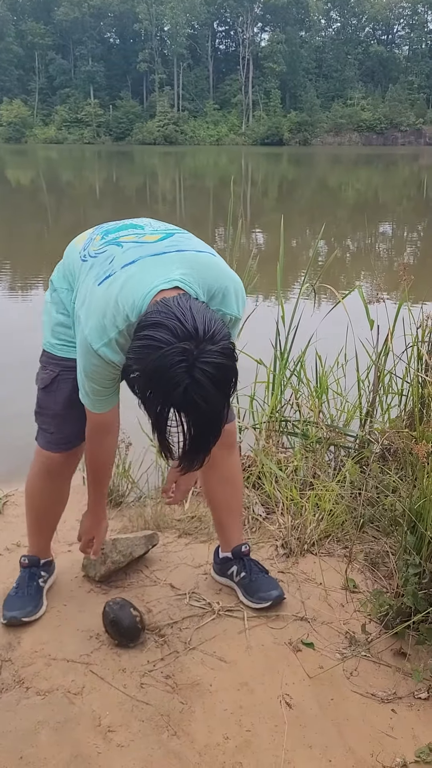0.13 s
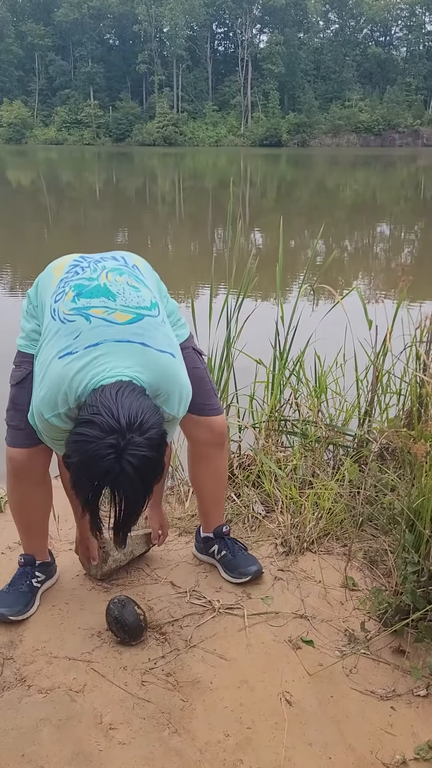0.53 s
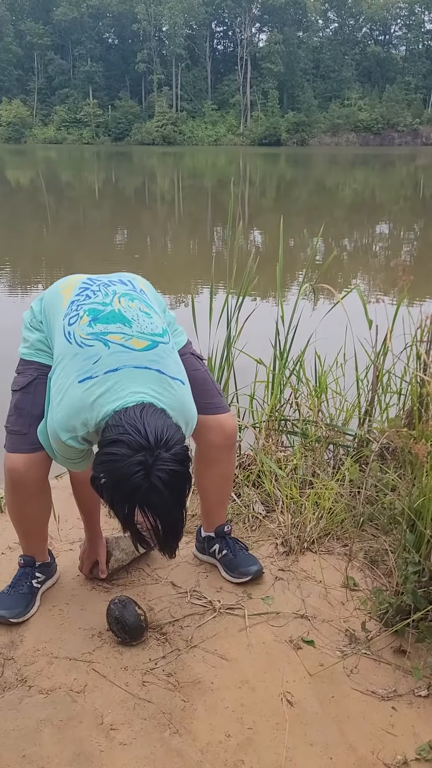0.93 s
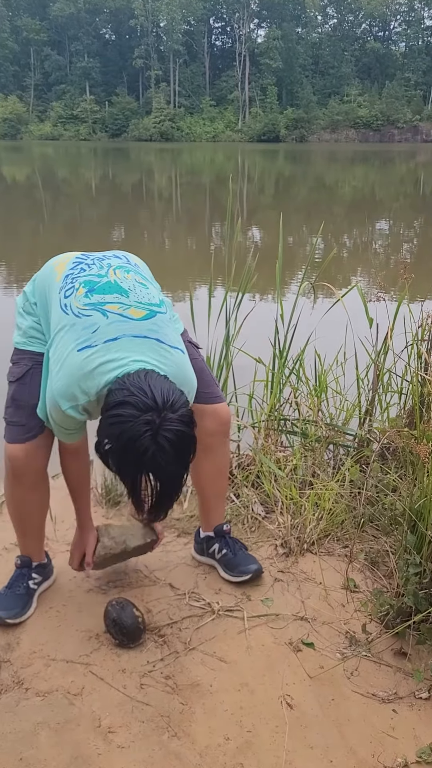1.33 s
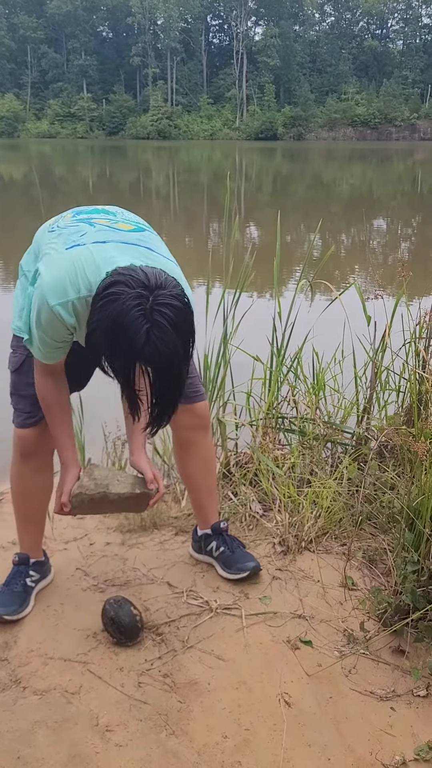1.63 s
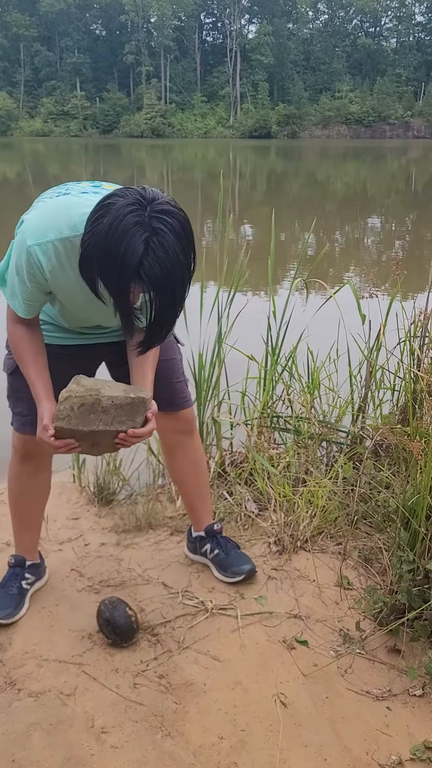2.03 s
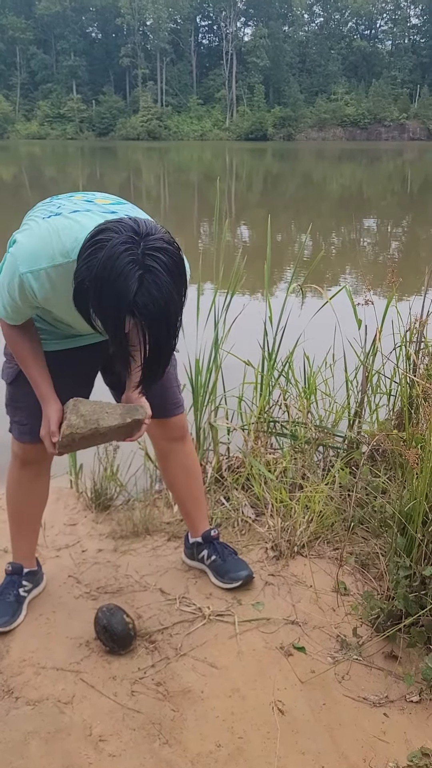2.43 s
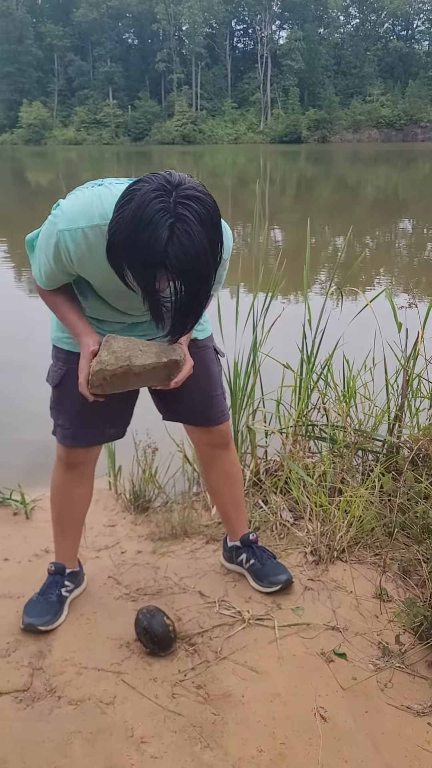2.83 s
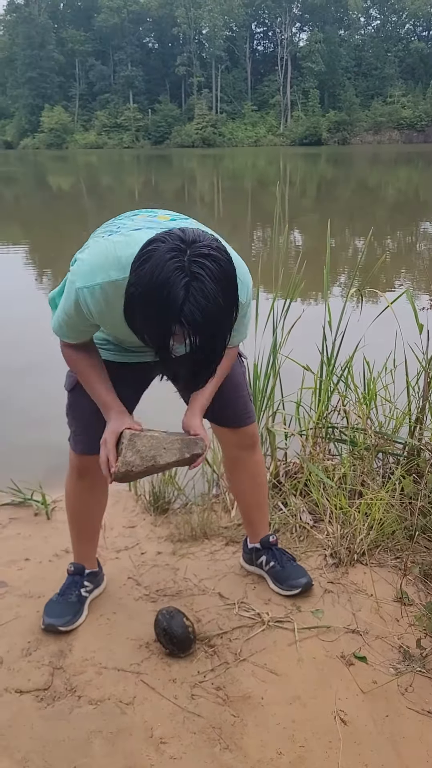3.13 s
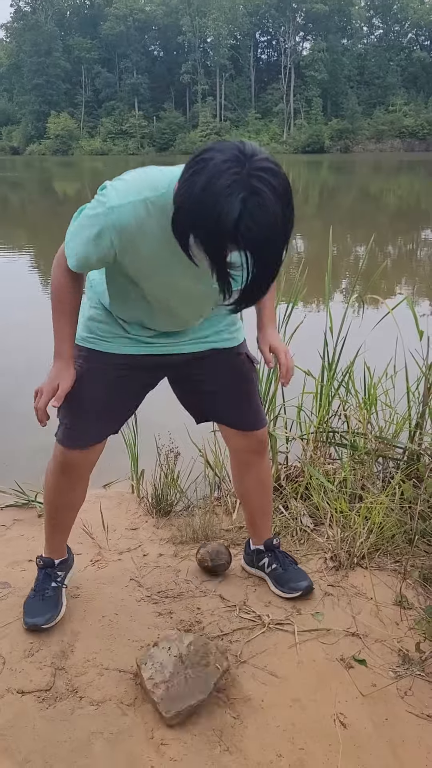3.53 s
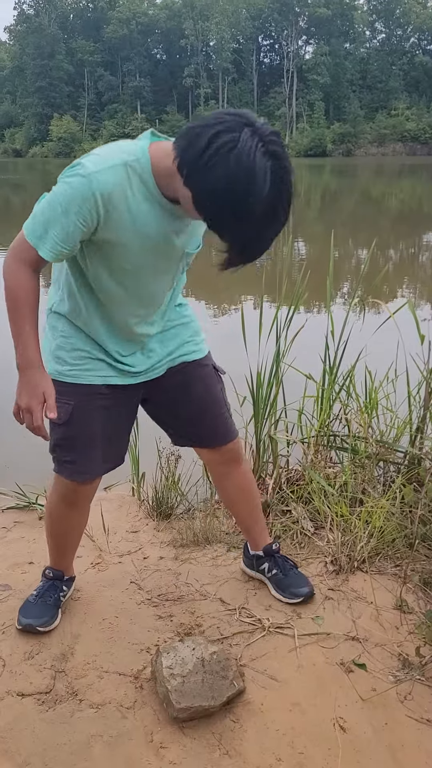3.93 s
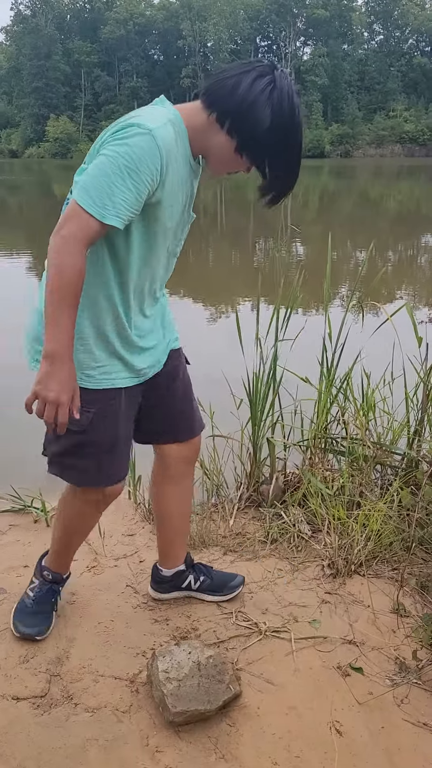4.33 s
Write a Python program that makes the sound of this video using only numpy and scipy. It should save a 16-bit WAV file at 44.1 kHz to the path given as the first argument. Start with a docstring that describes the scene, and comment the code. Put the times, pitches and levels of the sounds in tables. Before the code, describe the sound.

An open, echo-free sandy lakeshore heard through a phone's stereo microphones. A low, bassy bed of air and distant wavering machinery hum, with a very thin whine, runs throughout. From about 0.1 to 0.5 s, crisp gritty scuffs and a small dull thud sound as a rock is shifted on the sand. From 0.5 to 3.1 s it is quiet, with only faint cloth rustle and tiny sand ticks, rising slightly near 2.8 s. At about 3.28 s the rock hits a coconut: a very loud, sharp, dry knock, woody and hollow, with a deep short thud, a brief gritty scrape and a weaker second clack some 35 milliseconds later, spraying sand. The background dips slightly after it. Near 3.55 to 3.6 s the rock lands with a softer crunch and thump. From 3.9 to 4.4 s, shoes crunch the sand, strongest near 4.17 s, as bright clothing and reed rustle grows.

```python
"""Lake shore: a heavy rock knocks on a coconut on the sand, over distant machinery, open air and faint hiss.
The knock is short blows and a gritty slide ringing shell and rock modes, with noise bursts as sand spray.
Decaying sines thud in the ground; swelling, dying noise bursts are the sand crunching under shoes, rock and nut.
Bright noise is the rustle of clothes and reeds; wandering tones and low noise are the machinery.
A phone with two microphone ports listens, and its gain control ducks after the knock."""
import sys
import numpy as np
from scipy import signal
from scipy.io import wavfile
from scipy.ndimage import uniform_filter1d

SR = 44100
rng = np.random.default_rng(int(sys.argv[2]) if len(sys.argv) > 2 else 0)


def output_pcm(signal):
    """Save a mono or channel-first signal as 16-bit PCM at the path in sys.argv[1].

    Samples are clipped to [-1, 1] before scaling.
    """
    pcm = np.clip(np.atleast_2d(signal).T, -1, 1) * 32767
    wavfile.write(sys.argv[1], SR, np.round(pcm).astype(np.int16))


N = 198405
TIME = np.arange(N) / SR
LEFT_LAG = 8  # samples by which the impact reaches the left port later


def gain_of(db):
    """Decibels to gain."""
    return 10 ** (np.asarray(db) / 20)


def evened(x):
    """Scales to rms 1."""
    return x / np.sqrt(np.mean(x ** 2) + 1e-20)


def level(curve):
    """A (t/s, level/dB) curve read at every sample, silent outside its ends."""
    return np.interp(TIME, *np.transpose(curve), -200, -200)


def read(points, hz):
    """A spectrum table read on a log-frequency axis."""
    f, value = np.transpose(points)
    return np.interp(np.log(hz + 1), np.log(f + 1), value)


def band(x, lo_hz, hi_hz):
    """Band-pass."""
    return signal.sosfilt(signal.butter(2, [lo_hz, hi_hz], "bandpass", fs=SR, output="sos"), x)


def smoothed_noise(size):
    """White noise averaged over size samples: the larger, the slower it moves."""
    return uniform_filter1d(rng.standard_normal(N), size=size)


def grainy(spread_db, size):
    """A random level flicker of rms 1, as when grains slip in clumps; size in samples sets its pace."""
    return evened(gain_of(spread_db * evened(smoothed_noise(size))))


def narrow(hz, width):
    """A wavering tone of rms 1 whose pitch wanders slowly by width Hz rms."""
    wander = evened(uniform_filter1d(smoothed_noise(3000), size=3000))
    return np.sqrt(2) * np.sin(2 * np.pi * np.cumsum(hz + width * wander) / SR)


# how alike noise is at the two ports: (f/Hz, left-right correlation)
PORT_LIKENESS = [(60, 0.89), (130, 1), (290, 0.93), (640, 0.82), (1410, -0.07), (3100, -0.32), (6820, 0.19),
                 (15000, -0.14)]
# which port the noise leans to: (f/Hz, left over right level/dB)
PORT_LEAN = [(60, -3.5), (110, 1), (200, -2.5), (380, -2), (700, 0), (1290, -7), (2380, -7), (4400, 0),
             (8120, -6), (15000, 1)]


def noise(colour, patchy_db, size):
    """Stereo noise from random short-time spectra with drifting patches; the mono mix has rms 1."""
    hz = np.fft.rfftfreq(size, 1 / SR)
    a, b, c, d, patches = rng.standard_normal((4 * N // size + 5, len(hz), 5)).T
    patches = uniform_filter1d(patches, size=8, axis=0)
    patches = evened(uniform_filter1d(patches, size=10, axis=1))
    same = np.clip(read(PORT_LIKENESS, hz), -1, 1)[:, None]
    lean = gain_of(read(PORT_LEAN, hz)[:, None] / 2)
    left = a + 1j * b
    right = same * left + np.sqrt(1 - same ** 2) * (c + 1j * d)
    spectra = np.array([left * lean, right / lean])
    spectra *= gain_of(read(colour, hz)[:, None] + patchy_db * patches)
    out = signal.istft(spectra, nperseg=size, noverlap=3 * size // 4)[1][:, :N]
    return out / np.sqrt(np.mean(out.mean(0) ** 2))


# colour of the open air, mostly bass: (f/Hz, level per Hz/dB)
AIR_COLOUR = [(12, -78.5), (20, -34), (36, -5), (60, -5.5), (81, -7), (114, -5.5), (196, -15), (288, -17.5),
              (414, -29), (775, -31), (910, -29.5), (1070, -34.5), (1740, -37), (2500, -53.5), (3250, -100),
              (5500, -120)]
# colour of the faint hiss: (f/Hz, level per Hz/dB)
HISS_COLOUR = [(1470, -35.5), (2500, -27.5), (4730, -20), (6920, 0), (7890, -25.5), (9080, -5.5),
               (15200, -2), (16000, -19)]


def open_air():
    """A bass-heavy noise bed with a very faint hiss on top."""
    air = gain_of(-45.5) * noise(AIR_COLOUR, 1.7, size=2048)
    return air + gain_of(-79.5) * noise(HISS_COLOUR, 0.79, size=512)


# low tones of the hum: (f/Hz, wander/Hz, level in the hum/dB)
HUM_TONES = [(57.2, 2, 3.5), (112.2, 3.4, -5.5), (231.6, 5, -9)]
# tones of the whine: (f/Hz, level in the whine/dB)
WHINE_TONES = [(295.5, 2.5), (591, -4), (887, 5.5), (1182, -7)]
# hum rising and falling: (t/s, level/dB)
HUM_CURVE = [(0.0, -51), (0.08, -46.5), (0.5, -55), (0.8, -46.5), (0.9, -50), (1.07, -43.5), (1.22, -67),
             (1.35, -48.5), (1.72, -48.5), (1.8, -60), (2.07, -47), (2.56, -45.5), (2.63, -47.5),
             (2.78, -43.5), (3.14, -50), (3.3, -45.5), (3.7, -52), (3.85, -50.5), (4.3, -47.5),
             (4.499, -50.5)]
# rumble swelling: (t/s, level/dB)
RUMBLE_CURVE = [(0.0, -51.5), (0.56, -44.5), (1.1, -47), (1.22, -51.5), (1.6, -48.5), (2.2, -47),
                (2.9, -46), (3.3, -50), (3.9, -67), (4.4, -54)]
# whine coming and going: (t/s, level/dB)
WHINE_CURVE = [(0.0, -64.5), (0.1, -70.5), (0.3, -65), (0.65, -71.5), (0.75, -104), (0.82, -69.5),
               (0.93, -69), (1.07, -78), (1.2, -69.5), (1.3, -76.5), (1.5, -68), (1.78, -69), (1.9, -84),
               (2.15, -75), (2.42, -87), (2.55, -67), (2.63, -75.5), (2.75, -66), (3.2, -74.5), (3.69, -80),
               (4.0, -67), (4.29, -79), (4.4, -74), (4.499, -79)]


def machinery():
    """Distant machines: wavering low hum tones, a band of noise as swelling rumble, and a thin whine."""
    hum = sum(gain_of(db) * narrow(hz, width) for hz, width, db in HUM_TONES)
    hum = hum * grainy(1.88, size=3000)
    rumble = evened(band(rng.standard_normal(N), 69, 157.7)) * grainy(1.8, size=4000)
    whine = sum(gain_of(db) * narrow(hz, 1.23) for hz, db in WHINE_TONES)
    mix = hum * gain_of(level(HUM_CURVE))
    mix += rumble * gain_of(level(RUMBLE_CURVE))
    mix += whine * gain_of(level(WHINE_CURVE))
    return mix * gain_of([[-.7], [.7]])  # leans right


# clothes and reeds moving: (t/s, level of the rustle body/dB)
RUSTLE_CURVE = [(0.0, -49), (0.05, -53), (0.12, -77), (0.52, -68), (0.65, -70), (1.0, -64.5), (1.145, -58),
                (1.2, -76), (1.6, -80.5), (1.75, -64.5), (1.87, -70), (2.15, -61), (2.32, -62.5),
                (2.7, -69), (2.83, -58.5), (3.01, -59), (3.17, -58), (3.64, -58), (3.83, -57.5),
                (3.91, -56.5), (4.06, -55.5), (4.28, -52), (4.38, -53), (4.499, -75)]
# colour of the rustle: (f/Hz, level per Hz/dB)
CLOTH_COLOUR = [(1500, -4), (2500, -12), (3300, -20.5), (4400, -9.5), (7000, -3), (8700, -6.5),
                (10500, 9.5), (12500, 0), (14000, -4.5), (15500, -0.5), (16500, 4.5)]
TOP_DB, TOP_FOLLOW = 4.5, 0.94  # airy top over a body of -60 dB; dB it moves for each dB of the body


def rustle():
    """Rubbing cloth and reeds: bright hiss follows the movements, its airy top a little less strongly."""
    body_db = level(RUSTLE_CURVE)
    top_db = -60 + TOP_DB + TOP_FOLLOW * (body_db + 60)
    cloth = noise(CLOTH_COLOUR, 2, size=512) * grainy(1.4, size=1200)
    body = evened(band(cloth, 1500, 8800))
    top = evened(band(cloth, 8800, 20000))
    return body * gain_of(body_db) + top * gain_of(top_db)


# shoes, rock and nut crunching the sand: (t/s, peak level/dB, rise/s, hold/s, low crunch over hiss level/dB,
# boost of the airy top level/dB, crunch centre f/Hz, left over right level/dB)
SAND_SCUFFS = [(0.139, -36.5, 0.0048, 0.025, -8.5, -2.5, 1460, 0.5),
               (0.276, -38, 0.04, 0.0028, 3, -6.5, 2100, 0.5),
               (0.359, -31, 0.0078, 0.017, -3, -7.5, 1080, -0.5),
               (0.385, -44.5, 0.0081, 0.034, 9.5, -0.5, 1780, 3),
               (0.47, -70.5, 0.025, 0.063, 17, -10, 1590, 0), (1.905, -62.5, 0.006, 0.026, -24, 9, 2200, 0),
               (1.958, -57, 0.042, 0.11, -8.5, -4, 1840, -0.5), (2.17, -62, 0.032, 0.019, -23, 6, 2000, 3),
               (2.33, -58.5, 0.023, 0.029, -6, 7, 1750, 1), (2.39, -67.5, 0.022, 0.11, 11.5, -21, 1630, 0),
               (2.57, -57.5, .001, 0.0023, -15, -15, 2000, 0), (2.816, -61, .017, 0.064, -24, 7.5, 2190, 3),
               (2.95, -57.5, 0.018, 0.032, -9, 8.5, 1960, 3),
               (3.175, -46.5, 0.038, 0.018, -13, 9.5, 2000, 1.5),
               (3.327, -46.5, .004, 0.13, -1, -11, 2200, 3.5),
               (3.55, -42.5, 0.003, 0.0072, -26, 5, 2020, 4),
               (3.566, -41.5, 0.0075, 0.011, -18, -7, 1330, 1), (3.611, -59, 0.0067, 0.02, 2, 9, 1660, -3),
               (3.853, -58.5, 0.0095, 0.033, -15, 5, 1970, 3),
               (3.92, -59.5, 0.0048, 0.035, -18, 12, 2000, 2),
               (3.975, -49, 0.027, 0.022, -2.5, 9.5, 2160, 2),
               (4.099, -54, 0.0016, 0.002, 12.5, 12.5, 1990, 5),
               (4.165, -40.5, .003, 0.025, -3.5, 1, 1330, 0),
               (4.19, -51, 0.014, 0.034, 4.5, 11.5, 2150, 3.5),
               (4.352, -49.5, .009, 0.012, -1.5, 3, 2030, 2)]
# colour of the sand hiss: (f/Hz, level per Hz/dB)
SAND_COLOUR = [(1290, -6), (2200, -0.5), (3090, -12.5), (3300, -8), (4070, -4.5), (4420, -2.5), (4840, -4),
               (6470, -1), (9020, -13.5), (12300, -1), (16000, -7)]
CREST = 3  # peak over rms of a burst of grains
STOP_T60, T60_PER_HOLD = 0.013, 2.9  # s, and s per s of hold: longer scuffs die more slowly
TRICKLE_DB, TRICKLE_T60 = -10.5, 0.57  # loose grains settling: dB against the burst, s


def scuffs():
    """Each scuff is a burst of sand grains that swells, holds and dies; weight on them adds a lower crunch."""
    grains = grainy(1.4, size=60) * grainy(1.1, size=400)
    hiss = noise(SAND_COLOUR, 1.0, size=256) * grains
    coarse = noise([(100, 0), (16000, 0)], 3, size=256) * grains  # flat colour
    top = signal.sosfiltfilt(signal.butter(4, 9000, "highpass", fs=SR, output="sos"), hiss)
    out = np.zeros((2, N))
    for s, db, rise, hold, crunch_db, top_db, hz, pan_db in SAND_SCUFFS:
        swell = np.sin(np.pi / 2 * np.clip((TIME - s) / rise, 0, 1)) ** 2
        after = np.maximum(TIME - s - rise - hold, 0)
        stop = gain_of(-60 * after / (STOP_T60 + T60_PER_HOLD * hold))
        trickle = gain_of(TRICKLE_DB - 60 * after / TRICKLE_T60)
        shape = swell / CREST * gain_of(db) * (stop + trickle)
        crunch = evened(band(coarse, hz / 1.47, hz * 1.3))
        burst = hiss - top + gain_of(top_db) * top + gain_of(crunch_db) * crunch
        out += shape * gain_of([[pan_db / 2], [-pan_db / 2]]) * burst
    return out


# dull weight landing on the ground: (t/s, level before the soft onset/dB, f/Hz, t60/s)
GROUND_THUDS = [(0.144, -23.5, 273, 0.026), (3.285, -7.5, 273, 0.031), (3.288, -21, 103.7, 0.14),
                (3.295, -25, 318, 0.054), (3.326, -19, 222, 0.045), (3.333, -15, 110.3, 0.045),
                (3.613, -20, 206, 0.031)]


def thuds():
    """The ground gives under a weight: a low sine with a soft onset that dies quickly."""
    out = np.zeros(N)
    for s, db, hz, t60 in GROUND_THUDS:
        t = np.maximum(TIME - s, 0)
        onset = 1 - np.exp(-t / 0.0045)
        out += gain_of(db - 60 * t / t60) * np.sin(2 * np.pi * hz * t) * onset
    return np.array([np.roll(out, LEFT_LAG), out])


# rock meets shell: (t/s, blow level/dB, contact time/s)
ROCK_BLOWS = [(3.282, -27, 0.00008), (3.2843, -0.5, 0.0006), (3.2864, 1, 0.00017), (3.2878, -6.5, 0.00016),
              (3.2947, -36, .0003), (3.299, -24.5, .0006), (3.3174, -21.5, 0.00019), (3.3199, -9.5, .0002)]
# rock grinds over shell into the sand: (t/s, pressure level/dB)
GRIND_PRESSURE = [(3.2835, -84), (3.2845, -29), (3.288, -39.5), (3.299, -38.5), (3.314, -40), (3.3195, -38),
                  (3.323, -39.5), (3.331, -59.5), (3.40, -72.5), (3.45, -95.5)]
# modes of shell and rock: (f/Hz, t60/s, left level/dB, right level/dB)
SHELL_MODES = [(466, 0.014, -15, -16.5), (800, 0.0083, -2, -2), (850, 0.0039, -7.5, -2),
               (1246, 0.018, -20, -10.5), (1880, .02, -18, -10.5), (1860, 0.018, -11.5, -3),
               (1980, 0.011, -21.5, 2), (2200, .012, -16, -9), (2330, 0.01, -11, -9.5),
               (2570, .01, -7.5, -10.5), (2690, 0.0032, -20.5, -26.5), (3210, 0.0046, -4, -28.5),
               (4230, 0.002, -2.5, -20)]
# colour of the flying sand and splinters: (f/Hz, level per Hz/dB)
SPRAY_COLOUR = [(1290, -37.5), (2200, -11), (2430, -0.5), (2800, -15), (3440, -7), (5000, -11.5),
                (6010, -15), (6980, -9.5), (8660, -25), (10600, -13.5), (15100, -27), (16000, -27)]
SPRAY_DB = 12  # sand thrown by the slide, over its pressure
PUFF_DB, PUFF_T60 = -28.5, 0.015  # puff of splinters: dB against its blow, s


def knock():
    """Blows and a gritty slide drive the same modes, caught differently by each port; splinters and sand fly."""
    pressure = gain_of(level(GRIND_PRESSURE))
    spray = pressure * gain_of(SPRAY_DB)
    grit = rng.standard_normal((3, N))
    grit = grit[0] + .55 * grit[1:]  # partly shared by the two ports
    # light grit cannot move the low modes
    drive = band(grit, 990, 9000) * grainy(1.7, size=40) * pressure
    for s, db, contact in ROCK_BLOWS:
        u = (TIME - s - contact) / contact
        push_and_rebound = u * np.exp(-2 * u ** 2) / (contact * SR)  # shorter contact hits sharper
        drive = drive + gain_of(db) * push_and_rebound
        spray = spray + (TIME > s) * gain_of(db + PUFF_DB - 60 * abs(TIME - s) / PUFF_T60)
    t = TIME[:4000]
    ring = 0
    for hz, t60, left_db, right_db in SHELL_MODES:
        ring = ring + gain_of([[left_db], [right_db]] - 60 * t / t60) * np.sin(2 * np.pi * hz * t)
    left, right = signal.oaconvolve(drive, ring, axes=1)[:, :N]
    left = np.roll(left, LEFT_LAG)
    spray = spray * grainy(3.5, size=30)
    return np.array([left, right]) + noise(SPRAY_COLOUR, 2.5, size=128) * spray


def scene():
    """All sources summed, from the open air to the knock."""
    return open_air() + machinery() + rustle() + scuffs() + thuds() + knock()


def record(dry):
    """The microphone drops the deepest bass; gain control ducks and recovers slowly; then the band limit."""
    dry = signal.sosfilt(signal.butter(4, 38, "highpass", fs=SR, output="sos"), dry)
    power_db = 10 * np.log10(abs(uniform_filter1d((dry ** 2).mean(0), size=400)) + 1e-12)
    fall = TIME * 1.8  # the held peak sinks 1.8 dB a second
    held_db = np.maximum.accumulate(power_db + fall) - fall
    over_db = np.maximum(held_db + 45, 0)  # above a -45 dB threshold
    smooth = np.exp(-1 / (0.012 * SR))  # 12 ms
    duck_db = 0.11 * signal.lfilter([1 - smooth], [1, -smooth], over_db)
    ducked = dry / gain_of(duck_db)
    lowpass = signal.firwin(1023, 15960, window=("kaiser", 9), fs=SR)  # cutoff in Hz
    return signal.oaconvolve(ducked, lowpass[None], "same")


dry = scene()
out = record(dry)
output_pcm(out)
```